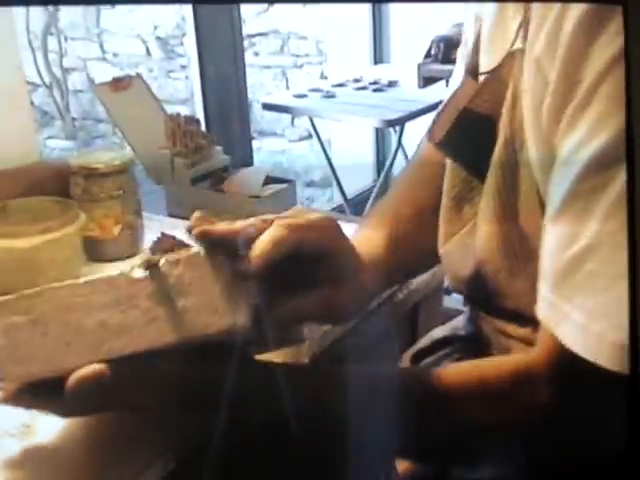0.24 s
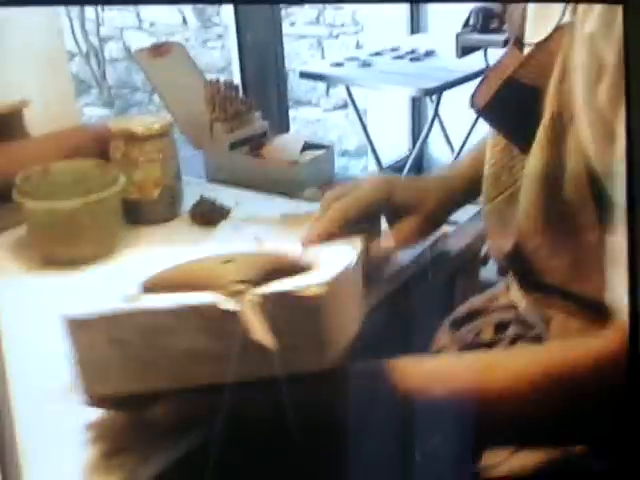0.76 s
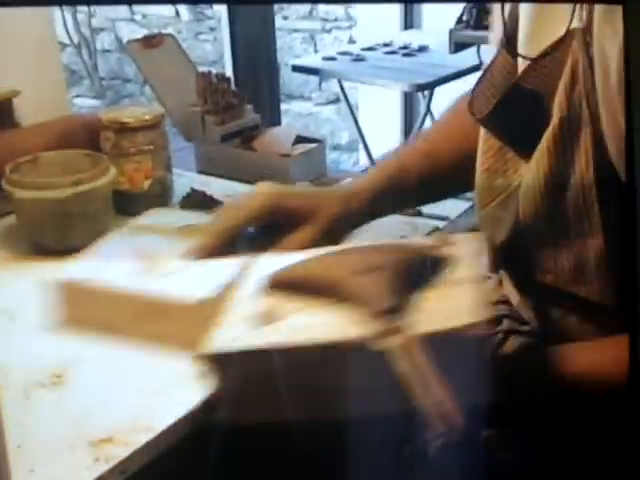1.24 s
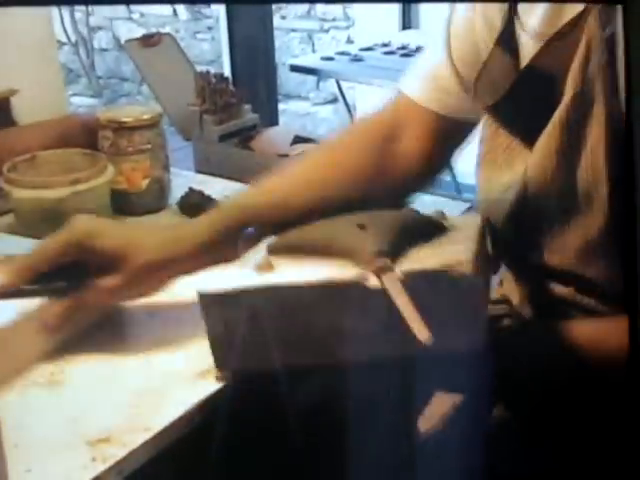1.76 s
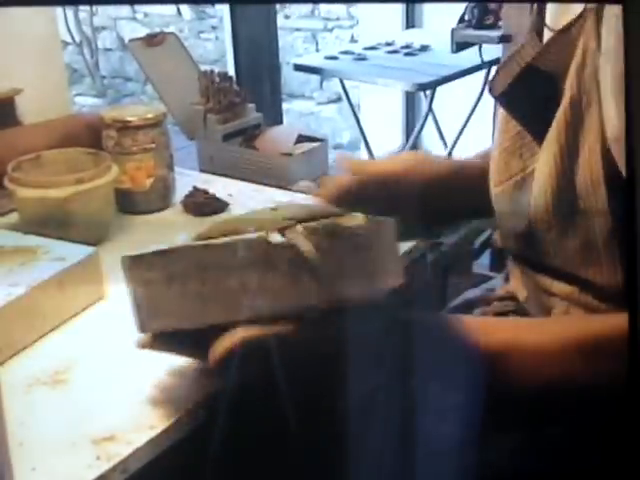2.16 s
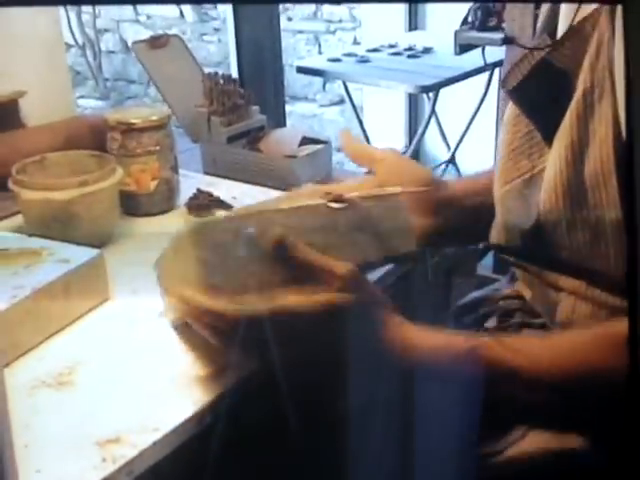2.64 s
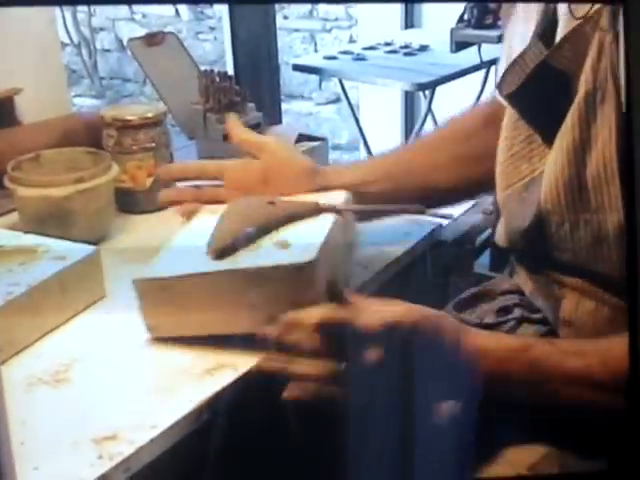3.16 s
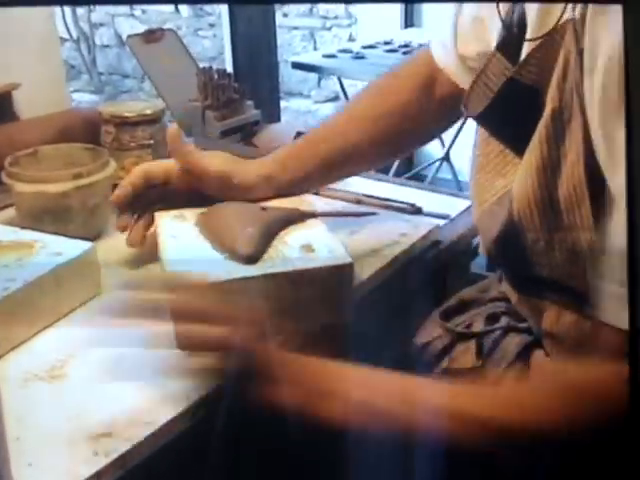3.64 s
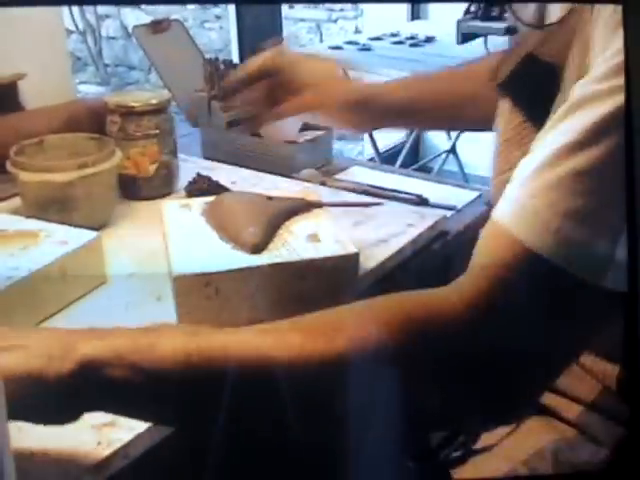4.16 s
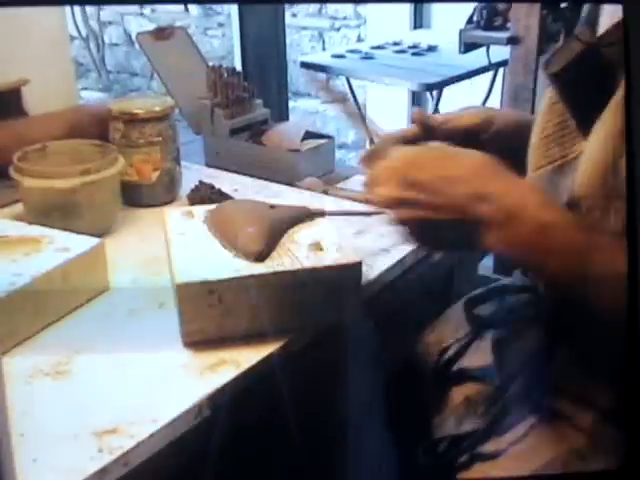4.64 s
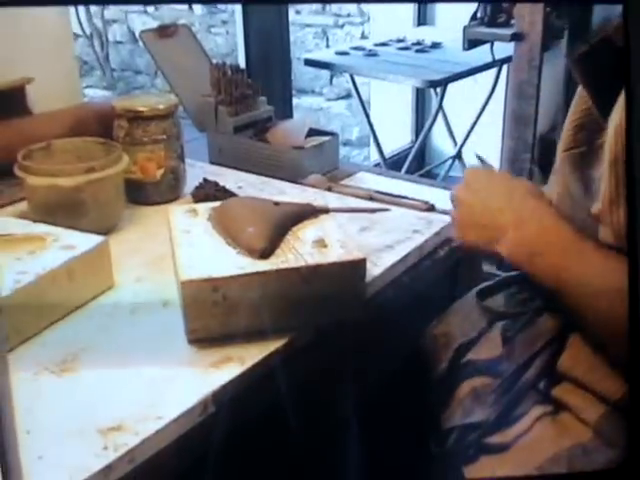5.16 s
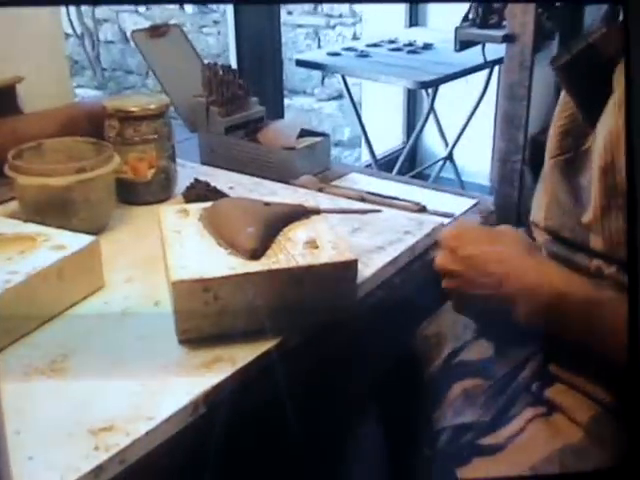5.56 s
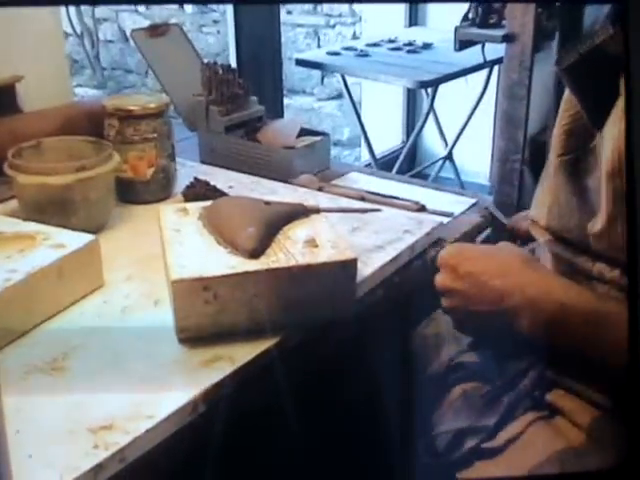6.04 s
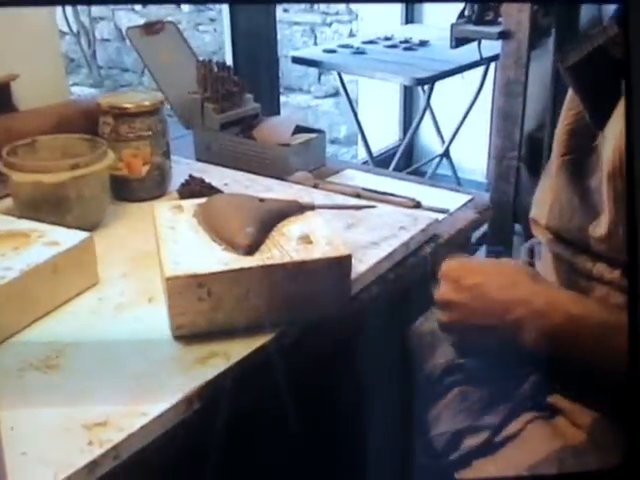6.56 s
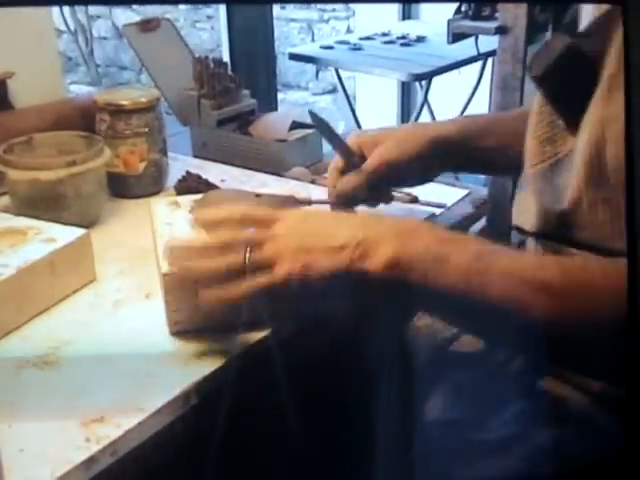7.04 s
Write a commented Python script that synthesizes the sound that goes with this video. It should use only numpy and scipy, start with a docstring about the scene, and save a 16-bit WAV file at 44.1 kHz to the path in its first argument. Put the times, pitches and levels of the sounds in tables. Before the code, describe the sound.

Close in a small, lively workshop, a plaster block lands edge first on a wooden bench and falls flat with a woody knock. Gritty scuffs and a long dry drag follow, then three quick landings, a soft rub and another firm set-down. A hand tool rattles in a rapid uneven run, ticks, and after a pause knocks four times on something hollow. A faint machine hum stays underneath.

```python
"""Plaster scrapes softly, then half of a mould lands on a wooden workbench, edge first, and falls flat.
One half is set down and slid away, the other is turned over and rocks to rest; a hand tool rattles as it is
picked up and knocks four times on something hollow, over the faint hum of a machine in a small workshop.
Contacts are bursts of grains with a slam, ringing through resonances; strokes are grains shaped by speed and
slips; air and echo are shaped noise, and the hum is wavering sines."""
import sys
import numpy as np
from scipy import signal
from scipy.fft import rfft, irfft
from scipy.io import wavfile
from scipy.ndimage import uniform_filter1d

SR = 44100
rng = np.random.default_rng(int(sys.argv[2]) if len(sys.argv) > 2 else 0)


def wav_record(signal):
    """Record a signal, one row per channel, as 16-bit PCM in the file named by sys.argv[1]."""
    frames = np.transpose(np.atleast_2d(signal))
    bounded = np.clip(frames, -1, 1)
    # unit amplitude maps onto the largest positive 16-bit level
    quanta = np.round(bounded * 32767).astype(np.int16)
    wavfile.write(sys.argv[1], SR, quanta)


N = 321930
TIME = np.arange(N) / SR

# In every contact, thump, crack and grit are relative to the knock. Levels are before the trims in scene().
# "contact/s" is the time constant of the pressure.

# mould half landing on an edge, chattering and falling flat: [t/s, knock level/dB, thump/dB, crack/dB,
#  grit/dB, contact/s, thump f/Hz, knock f/Hz, time to fall flat/s, chatter level/dB, flat landing level/dB,
#  its thump/dB, its crack/dB]
LANDINGS = [(0.346, -13.5, -0.5, -3.5, -21, 0.0056, 308, 760, 0.052, -26.5, -18, -1.5, -4),
            (2.374, -8.5, -7, -8, -16.5, 0.0038, 358, 1560, 0.034, -28.5, -28.5, 6.5, 4),
            (2.631, -14.5, -5, -11, -31.5, 0.00478, 304, 1700, 0.05, -35.5, -30, 1, 3),
            (2.821, -20, -1, -12.5, -36, 0.0041, 295, 1060, 0.086, -42.5, -32, -2, -1.5),
            (3.541, -11.5, -8, -12.5, -49, 0.0043, 330, 616, 0.027, -68, -22.5, 3.5, -2.5)]
# colour of the chatter between edge and flat: [thump/dB, crack/dB, grit/dB]
CHATTER_COLOUR = (-6, -0.42, -5.5)
# resonances of the mould on the bench: [f/Hz, width/Hz, lift level/dB]
MOULD_MODES = [(448, 52, -14), (730, 69, -5.5), (1293, 226, 11.5), (1600, 140, -5), (2020, 220, -3.5),
               (2400, 82, -3), (2834, 190, 12), (3020, 80, 9.5), (3180, 73, 4), (3730, 310, 10),
               (4370, 950, 11), (8440, 1600, 4)]
# one row each for the mould's thump, knock, crack and grit: [low f/Hz, high f/Hz]
MOULD_RANGES = [(210, 600), (600, 1750), (1650, 5700), (5000, 9400)]
# crumbs bursting under the landing block: [t/s, level/dB]
CRUMBS = [(0.359, -28), (0.369, -37), (2.393, -34.5), (2.408, -34), (3.568, -39.5)]
# dull bumps of a half on the bench: [t/s, level/dB, bench ring f/Hz]
BUMPS = [(0.431, -35, 350), (0.961, -42.5, 305), (1.019, -41, 296), (1.312, -33.5, 264),
         (1.432, -35.5, 310)]
# colour of a bump: [thump/dB, crack/dB, grit/dB]
BUMP_COLOUR = (11.1, 0.92, -41)
# plaster edge catching and scuffing along: [t/s, knock level/dB, crack/dB, grit/dB]
SCUFFS = [(0.682, -28.5, 2.5, -7.5), (0.820, -37.5, 4.5, -7), (0.902, -32, 7, -7),
          (1.138, -24.5, -4.5, -40), (1.81, -26, 2, -6)]
# hard corner of plaster clacking: [t/s, knock level/dB, thump/dB, crack/dB, grit/dB, contact/s,
#  added ring f/Hz, its lift level/dB]
CLACKS = [(1.019, -27.5, -15, 5, -26, 0.0062, 4580, 20.5), (1.842, -32.5, -8, 12.5, 0, 0.0095, 3080, 17)]
# resonances of that corner: [f/Hz, width/Hz, lift level/dB]
CORNER_MODES = [(1290, 160, 11), (1410, 310, 12.5), (2780, 64, 15), (3700, 110, -5), (4120, 110, 15),
                (4620, 160, 10.5), (8900, 640, 23)]
# plaster or the tool pushed or rubbed in one stroke:
# [start t/s, length/s, rumble level/dB, rasp level/dB], both at top speed before the swell
STROKES = [(-0.1, 0.72, -56.5, -51.5), (0.712, 0.33, -48, -49.5), (1.058, 1, -36.5, -35),
           (1.785, 0.14, -50, -52), (2.785, 0.72, -45.5, -48), (4.265, 0.2, -51, -46),
           (5.475, 0.23, -42.5, -43), (6.167, 0.25, -48.5, -52.5)]
# spectrum of the rumble in the bench: [f/Hz, relative level/dB]
RUMBLE = [(76, -49), (130, -46), (215, -30), (264, 2), (394, -1.5), (496, -3.5), (645, -6.5), (996, 0.5),
          (1360, 2.5), (1780, -16.5), (2000, -9.5), (2600, -11.5), (4400, -120)]
# spectrum of the rasp at the edge, before the mould rings: [f/Hz, relative level/dB]
RASP = [(880, -51), (1500, -1), (1780, -2), (2060, -3), (2460, -10), (2730, -5), (3370, -6.5), (4410, -4.5),
        (6450, -14), (9590, -26.5), (10400, -48), (13500, -81), (22000, -120)]
# hand tool clattering over the bench: [t/s, knock level/dB, thump/dB, crack/dB, grit/dB, contact/s]
RATTLES = [(4.056, -33, -10, -14, -24, 0.0058), (4.101, -29.5, -14, 1.5, -8, 0.0031),
           (4.108, -25.5, -11, -2.5, -13, 0.0067), (4.178, -30, -11.5, 3.5, -9, 0.0046),
           (4.238, -29, -9, -1, -33, 0.0037), (4.262, -24, -9, -0.5, -22, 0.0051),
           (4.277, -27.5, -19, 0, -14, 0.0041), (4.291, -22.5, -18, -5, -19, 0.0041),
           (4.335, -37, -20, 10, -29, 0.0077), (4.354, -21.5, -12.5, 1.5, -12, 0.0055),
           (4.37, -23, -18, -1, -29, 0.0027), (4.382, -25.5, -27, 5, -7, 0.0047),
           (4.413, -23, -12.5, 2.5, -5, 0.0065), (4.428, -27, -27, 3.5, -8, 0.0048),
           (4.462, -26.5, -24, -12, -13, 0.0025)]
# resonances of the tool on the bench, before each strike varies them: [f/Hz, width/Hz, lift level/dB]
TOOL_MODES = [(1167, 460, 0), (1318, 75, 19.5), (2880, 120, 7), (3800, 360, 5), (4600, 680, 6.5),
              (8600, 450, 13.5)]
# one row each for the tool's thump, knock, crack and grit: [low f/Hz, high f/Hz]
TOOL_RANGES = [(290, 540), (780, 1510), (2100, 4760), (5200, 9500)]
# short rings of the tool as it is taken up: [f/Hz, width/Hz, lift level/dB]
BLADE_MODES = [(4250, 790, 11), (7200, 900, 5)]
# colour of that tick: [thump/dB, crack/dB, grit/dB]
TICK_COLOUR = (-14, 9.7, 1.2)
# hollow taps, each landing twice: [t/s, knock level/dB, thump/dB, crack/dB, grit/dB, first ring f/Hz,
#  lift level of both rings/dB, delay/s, second knock level/dB, second ring f/Hz,
#  width of the rings towards the walls/Hz, extra level towards the walls/dB]
TAPS = [(5.440, -21, -4.5, -33, -20.5, 890, -2, 0.0088, -25.5, 1150, 400, 1),
        (5.710, -14.5, -11.5, -12.5, -11.5, 862, 17, .005, -18, 912, 141, -1),
        (6.0876, -9, -15.5, -11, -23.5, 980, 21, .0045, -7, 1235, 640, -1.9),
        (6.417, -15.5, -12, -10, -11.5, 1050, 20, .007, -8, 1340, 910, -2.5)]
# resonances of the hollow thing: [f/Hz, width/Hz, lift level/dB]
HOLLOW_MODES = [(349, 24, 10), (524, 110, 15), (880, 150, -4), (1175, 44, 4), (2060, 410, 4),
                (2760, 120, 12.5), (4380, 670, 12), (7500, 270, 3)]
# one row each for the hollow thing's thump, knock, crack and grit: [low f/Hz, high f/Hz]
HOLLOW_RANGES = [(250, 535), (770, 1410), (1550, 3800), (3700, 10000)]
# what is added to a tap's colour towards the walls, where more crack goes: [thump/dB, crack/dB, grit/dB]
WALLS_COLOUR = (0, 1.2, 2.8)
# thin rings of something metal: [f/Hz, peak level/dB, t60/s]
METAL = [(3710, -39, 0.97), (5270, -47, 1), (8830, -43, .35)]
# the workshop's echo: [f/Hz, relative level/dB, t60/s]
ROOM = [(153, -3.5, 0.82), (310, 2, 0.45), (660, 2, 0.47), (1310, -5, 0.52), (2560, 0.5, 0.41),
        (4700, -5.5, 0.51), (9000, -6, 0.55)]
# standing waves that colour every echo: [f/Hz, width/Hz, lift level/dB]
ROOM_MODES = [(276, 24, -8.5), (321, 17, 0.5), (495.4, 23, 6), (950, 76, 2), (1173, 35, -3)]
# spectrum of the still air: [f/Hz, relative level/dB]
AIR = [(15, -76.5), (25, -34), (146, -28), (184, -21.5), (225, -17.5), (312, -11), (530, -17.5), (601, -15),
       (735, -17), (793, -15.5), (1530, -15.5), (1820, -18), (2470, -25), (3990, -24.5), (10400, -34.5),
       (13500, -65), (22000, -120)]
# lines of the machine hum: [centre f/Hz, peak level/dB before trim and waver]
HUM = [(177.6, -71), (199.2, -73.5), (301.5, -80), (619.1, -58.5), (963.6, -72.5), (1163, -71.5),
       (1766, -85), (2024, -71.5)]


def from_db(db):
    """Decibels to gain."""
    return 10 ** (np.asarray(db) / 20)


def rms_one(x):
    """Scale to unit rms."""
    return x / np.sqrt(np.mean(x ** 2) + 1e-20)


def at_hz(points, hz, axis=1):
    """Read one column of a table along log frequency."""
    points = np.array(points)
    return np.interp(np.log(hz + 1e-9), np.log(points[:, 0]), points[:, axis])


def band(x, low_hz, high_hz, order=3):
    """Causal band-pass."""
    return signal.sosfilt(signal.butter(order, [low_hz, high_hz], "band", fs=SR, output="sos"), x)


def coloured(x, spectrum):
    """Give a steady sound a spectrum; rms 1."""
    gain = from_db(at_hz(spectrum, np.fft.rfftfreq(N, 1 / SR)))
    return rms_one(irfft(rfft(x) * gain, N))


def drift(rate_hz, size=8192):
    """Random wander with spread 1, weakening above rate_hz."""
    hz = np.fft.rfftfreq(size, N / SR / size)
    wander = rms_one(irfft(rfft(rng.standard_normal(size)) / (1 + (hz / rate_hz) ** 2), size))
    return np.interp(TIME, np.linspace(0, N / SR, size), wander)


def add(track, s, sound):
    """Mix a sound in at time s."""
    start = round(s * SR)
    track[start:start + len(sound)] += sound


def grains(size, spread_db):
    """Plaster grains breaking: dense clicks of very uneven strength."""
    lift_db = spread_db * np.minimum(rng.exponential(1, size), 5)
    return rng.standard_normal(size) * from_db(lift_db)


def resonate(x, modes):
    """A body passes the force on and rings at its modes."""
    out = x.copy()
    for hz, width_hz, lift_db in modes:
        r = np.exp(-np.pi * width_hz / SR)
        poles = [1, -2 * r * np.cos(2 * np.pi * hz / SR), r * r]
        out += from_db(lift_db) * (1 - r * r) / 2 * signal.lfilter([1, 0, -1], poles, x)
    return out


def contact(row, modes, ranges, grain_db, extra_s, slam):
    """Rough faces meet: a crunch of grains swells, the faces slam home, and the body rings."""
    knock_db, thump_db, crack_db, grit_db, contact_s = row
    t = TIME[:SR // 5] / contact_s
    pressure = t ** 0.9 * np.exp(-t) + 1e-9
    # a contact with little grit is soft, so its crack is duller too
    soft_hz = np.clip(7000 * from_db((grit_db - crack_db) / 2), 1900, 12000)
    softness = signal.butter(2, soft_hz, fs=SR, output="sos")
    out = 0
    for (low_hz, high_hz), rel_db in zip(ranges, [thump_db, 0, crack_db, grit_db]):
        force = pressure * grains(len(t), grain_db)
        force[np.argmax(pressure)] += slam * np.linalg.norm(force)
        part = band(resonate(signal.sosfilt(softness, force), modes), low_hz, high_hz)
        out = out + from_db(knock_db + rel_db) * rms_one(part)
    # a longer contact spends more energy
    return out * np.sqrt((contact_s + extra_s) * SR / len(t))


def set_down(level_db, grain_db, extra_s, slam, count=3):
    """An edge strikes first; the block chatters on crumbs at shrinking gaps and falls flat with a thump."""
    flat_grit_db, flat_s, chatter_s = -27, 0.00487, 0.0036   # contact times in s
    hurry = 0.82   # under 1: the gaps shrink as the block settles
    out = np.zeros(N)
    for s, *edge, thump_hz, knock_hz, fall_s, chatter_db, flat_db, flat_thump_db, flat_crack_db in LANDINGS:
        # the bench's low ring follows where the block lands, the broad knock which edge lands
        modes = MOULD_MODES + [(thump_hz, 125, 5), (knock_hz, 210, -5)]
        flat = (flat_db, flat_thump_db, flat_crack_db, flat_grit_db, flat_s)
        touches = [(s, edge), (s + fall_s, flat)]
        for k in range(1, count):
            chatter_at_s = s + fall_s * (k / count) ** hurry
            touches.append((chatter_at_s, (chatter_db, *CHATTER_COLOUR, chatter_s)))
        for at_s, row in touches:
            add(out, at_s, contact(row, modes, MOULD_RANGES, grain_db, extra_s, slam))
    return from_db(level_db) * out


def crunch(grain_db):
    """Single crumbs burst under the block with a short bright spit."""
    peak_s = 0.0013
    out, t = np.zeros(N), TIME[:SR // 20] / peak_s
    for s, level_db in CRUMBS:
        spit = rms_one(band(resonate(grains(len(t), grain_db), MOULD_MODES), 7040, 9200))
        add(out, s, from_db(level_db) * spit * t * np.exp(1 - t))
    return out


def bump(grain_db, extra_s, slam):
    """Dull bumps set the bench top ringing."""
    contact_s, bench_width_hz, bench_lift_db = 0.00367, 41, 12
    out = np.zeros(N)
    for s, level_db, ring_hz in BUMPS:
        modes = MOULD_MODES + [(ring_hz, bench_width_hz, bench_lift_db)]
        row = (level_db, *BUMP_COLOUR, contact_s)
        add(out, s, contact(row, modes, MOULD_RANGES, grain_db, extra_s, slam))
    return out


def scuff(level_db, grain_db, extra_s, slam):
    """The edge catches with a short gritty scuff."""
    contact_s, thump_db = 0.0055, -4.5
    out = np.zeros(N)
    for s, knock_db, crack_db, grit_db in SCUFFS:
        row = (knock_db, thump_db, crack_db, grit_db, contact_s)
        add(out, s, contact(row, MOULD_MODES, MOULD_RANGES, grain_db, extra_s, slam))
    return from_db(level_db) * out


def clack(grain_db, extra_s, slam):
    """A hard corner strikes and the plaster rings briefly, like pottery."""
    ring_width_hz = 380
    out = np.zeros(N)
    for s, *row, ring_hz, ring_db in CLACKS:
        modes = CORNER_MODES + [(ring_hz, ring_width_hz, ring_db)]
        add(out, s, contact(row, modes, MOULD_RANGES, grain_db, extra_s, slam))
    return out


def slips():
    """The edge sticks and lets go at uneven gaps; each slip starts sharply and dies down."""
    slips_per_s = 75 * np.exp(0.45 * drift(60))
    progress = np.cumsum(slips_per_s) / SR % 1
    return from_db(-1.5 * progress)


def rubbed(force):
    """The edge travels over the bench, so the mould's rings come and go one by one; rms 1."""
    ring_db, wander_db = -4, 4
    out = force
    for mode in MOULD_MODES:
        ring = resonate(force, [mode]) - force
        out = out + from_db(ring_db + wander_db * drift(26)) * ring
    return rms_one(out)


def shifting(x, patchy_db, rate_hz, count=9):
    """The points of contact keep changing, so each band swells and fades on its own; rms 1."""
    log_hz = np.log(np.fft.rfftfreq(N, 1 / SR) + 1)
    place = np.interp(log_hz, np.log([250, 6000]), [0, count - 1])
    spectrum = rfft(x)
    out = 0
    for k in range(count):
        part = irfft(spectrum * np.maximum(1 - np.abs(place - k), 0), N)
        out = out + part * from_db(patchy_db * drift(rate_hz))
    return rms_one(out)


def drag(swell_db, patchy_db, grain_db):
    """Each stroke speeds up and slows down; grains rasp at the plaster's edge and the bench rumbles."""
    rumble_lead = 0.96   # under 1: the weight bears down early, so the rumble peaks before the rasp
    rumble_follows, rasp_follows = 0.53, 0.76   # gain as a power of the speed
    rumble_gain, rasp_gain = np.zeros((2, N))
    for s, length_s, rumble_db, rasp_db in STROKES:
        progress = np.clip((TIME - s) / length_s, 0, 1)
        rumble_speed = np.abs(np.sin(np.pi * progress ** rumble_lead))
        rasp_speed = np.abs(np.sin(np.pi * progress))
        rumble_gain += from_db(rumble_db) * rumble_speed ** rumble_follows
        rasp_gain += from_db(rasp_db) * rasp_speed ** rasp_follows
    judder = slips()
    rumble = shifting(coloured(judder * grains(N, grain_db), RUMBLE), patchy_db, rate_hz=18)
    rasp = shifting(rubbed(coloured(judder * grains(N, grain_db), RASP)), patchy_db, rate_hz=93)
    return from_db(swell_db * drift(16.0)) * (rumble_gain * rumble + rasp_gain * rasp)


def rattle(level_db, grain_db, extra_s, slam):
    """The hand tool strikes the bench in a quick, uneven run, ringing a little differently each time."""
    detune, vary_db = 0.011, 2.5   # each strike meets another spot: spread of pitch (share) and strength
    out = np.zeros(N)
    for s, *row in RATTLES:
        modes = []
        for hz, width_hz, lift_db in TOOL_MODES:
            modes.append((hz * (1 + detune * rng.normal()), width_hz, lift_db + vary_db * rng.normal()))
        add(out, s, contact(row, modes, TOOL_RANGES, grain_db, extra_s, slam))
    return from_db(level_db) * out


def tool_tick(extra_s):
    """The hand tool ticks once as it is taken up, with short bright rings."""
    at_s, knock_db, contact_s = 4.708, -43.5, 0.0034
    out = np.zeros(N)
    row = (knock_db, *TICK_COLOUR, contact_s)
    add(out, at_s, contact(row, BLADE_MODES, MOULD_RANGES, grain_db=1.5, extra_s=extra_s, slam=0.56))
    return out


def taps(near_db, walls_db):
    """Each tap favours another ring of the hollow thing, then lands again on a stiffer spot that rings higher.
    Returns the direct sound and the mix, with rings of another width, that goes to the walls."""
    contact_s, near_width_hz = 0.002835, 90
    near, walls = np.zeros((2, N))
    for s, first_db, *colour, first_hz, ring_db, delay_s, second_db, second_hz, wide_hz, send_db in TAPS:
        walls_colour = np.add(colour, WALLS_COLOUR)
        paths = [(near, near_width_hz, near_db, colour), (walls, wide_hz, walls_db + send_db, walls_colour)]
        for at_s, knock_db, hz in [(s, first_db, first_hz), (s + delay_s, second_db, second_hz)]:
            for track, width_hz, level_db, path_colour in paths:
                modes = HOLLOW_MODES + [(hz, width_hz, ring_db)]
                row = (knock_db + level_db, *path_colour, contact_s)
                tap = contact(row, modes, HOLLOW_RANGES, grain_db=3.0, extra_s=0.0016, slam=0.36)
                add(track, at_s, tap)
    return near, walls


def jolted_metal():
    """The first landing jolts something metal on the bench, which rings on faintly as decaying sines."""
    jolt_at_s = 0.352
    out, t = np.zeros(N), TIME[:SR]
    for hz, level_db, t60 in METAL:
        decay = np.exp(-np.log(1000) * t / t60)
        add(out, jolt_at_s, from_db(level_db) * decay * np.sin(2 * np.pi * hz * t))
    return out


def low_noise(drive, level_db, boom_db):
    """Faint low noise and a boom near 190 Hz follow the energy of the sounds."""
    low = rms_one(band(rng.standard_normal(N), 18, 170, order=2))
    boom = rms_one(band(rng.standard_normal(N), 176.6, 197.5))
    keep = np.exp(-1 / (0.024 * SR))   # the level follows the energy over about 24 ms
    level = np.sqrt(signal.lfilter([1 - keep], [1, -keep], drive ** 2))
    return level * (from_db(level_db) * low + from_db(boom_db) * boom)


def workshop(x, first_echo_s, build_s):
    """Diffuse echo that builds up after the first reflection and dies away band by band."""
    t = TIME[:SR]
    onset = 1 - np.exp(-np.maximum(t - first_echo_s, 0) / build_s)
    edges = np.geomspace(60, 18000, 13)
    response = 0
    for low_hz, high_hz in zip(edges, edges[1:]):
        t60 = at_hz(ROOM, np.sqrt(low_hz * high_hz), axis=2)
        decay = np.exp(-np.log(1000) * t / t60)
        response = response + band(rng.standard_normal(SR), low_hz, high_hz, order=2) * onset * decay
    # the echo's spectrum is evened out, then shaped by ROOM
    spectrum = rfft(response)
    power = uniform_filter1d(np.abs(spectrum) ** 2, size=32)
    even = spectrum / np.sqrt(power + 1e-3 * power.mean())
    response = irfft(even * from_db(at_hz(ROOM, np.fft.rfftfreq(SR, 1 / SR))), SR)
    return signal.fftconvolve(x, response[t < 0.8])[:N]


def background(air_db, hum_db, waver_db, wander_hz):
    """Still room air as shaped noise, and a machine's hum as sines wavering in pitch and level."""
    out = from_db(air_db) * coloured(rng.standard_normal(N), AIR)
    for hz, line_db in HUM:
        phase = 2 * np.pi * np.cumsum(hz + wander_hz * drift(7.02)) / SR
        out = out + from_db(line_db + hum_db + waver_db * drift(2.3)) * np.sin(phase)
    return out


def scene():
    """Mix the sources, the echo of what they send to the room, the low noise and the background."""
    knocks = set_down(level_db=-4.0, grain_db=4.0, extra_s=0.0016, slam=0.35) + crunch(grain_db=3.5)
    bumps = bump(grain_db=4.0, extra_s=0.00059, slam=0.54)
    scuffs = scuff(level_db=-6.5, grain_db=5.5, extra_s=0.0027, slam=0.053)
    scuffs = scuffs + clack(grain_db=0.5, extra_s=0.00055, slam=0.23)
    drags = drag(swell_db=3.0, patchy_db=2.5, grain_db=3.0)
    clatter = rattle(level_db=-2.0, grain_db=1.5, extra_s=0.0032, slam=0.085)
    tick = tool_tick(extra_s=0.0021)
    tool, tool_to_walls = taps(near_db=-4.0, walls_db=-4.0)

    sent = from_db(2.0) * knocks + from_db(-1.5) * (scuffs + bumps) + tool_to_walls + drags
    sent = sent + from_db(-1.0) * clatter + from_db(-3.5) * tick
    echo = resonate(workshop(sent, first_echo_s=0.0063, build_s=0.00023), ROOM_MODES)

    drive = knocks + from_db(4) * bumps + from_db(-7) * tool + from_db(-18) * drags + from_db(-12) * echo
    low = low_noise(drive, level_db=-38, boom_db=-41.0)
    floor = background(air_db=-52, hum_db=5.5, waver_db=1.5, wander_hz=2.815)
    direct = knocks + bumps + scuffs + drags + clatter + tick + tool + jolted_metal()
    return (direct + echo + low + floor)[None]


def record(dry):
    """The loudest peaks are rounded and the top is cut steeply."""
    ceiling, cutoff_hz = 0.6, 10250
    rounded = ceiling * np.tanh(dry / ceiling)
    steep_cut = signal.ellip(10, 0.2, 74, cutoff_hz, fs=SR, output="sos")
    return signal.sosfilt(steep_cut, rounded)


dry = scene()
out = record(dry)
wav_record(out)
```